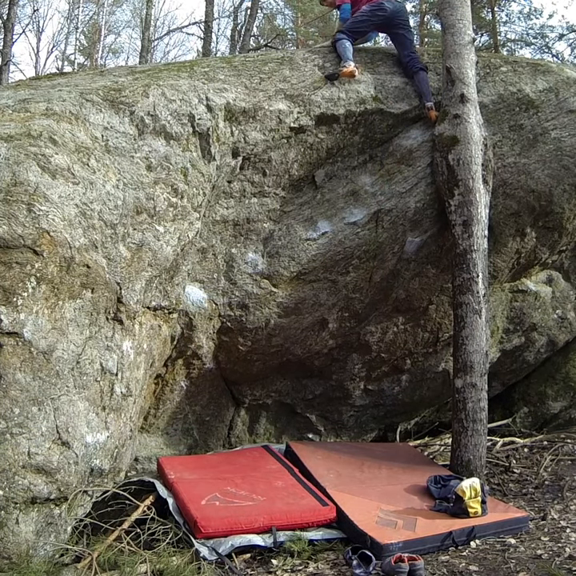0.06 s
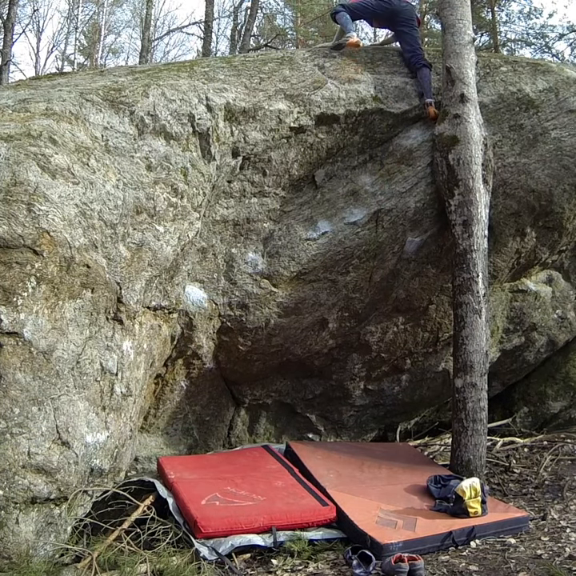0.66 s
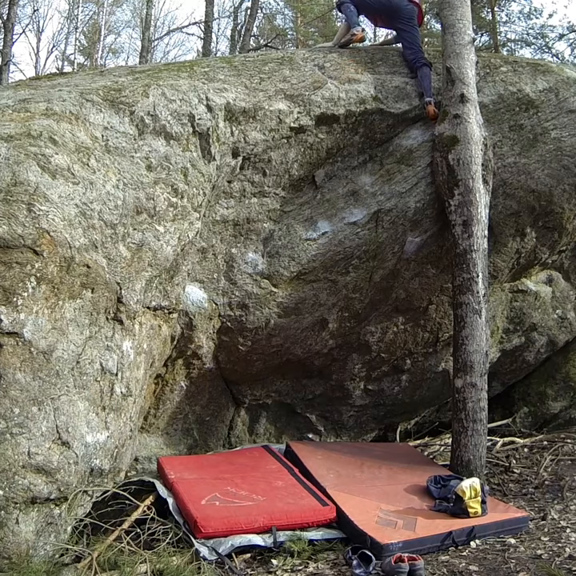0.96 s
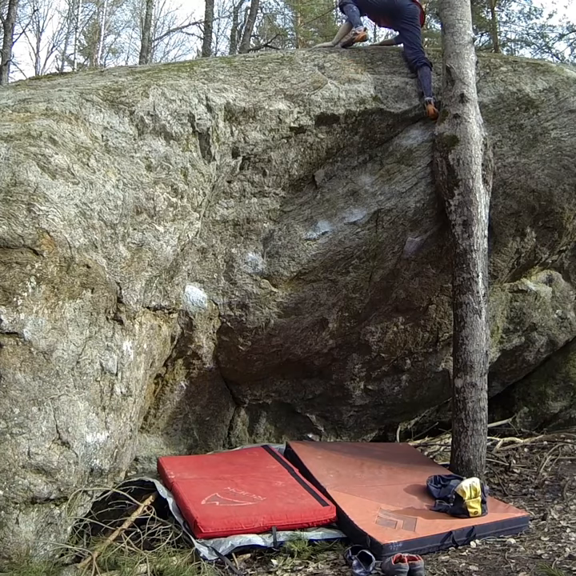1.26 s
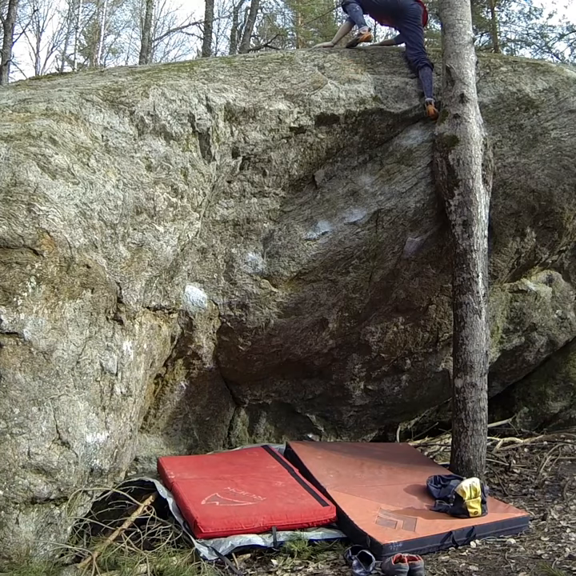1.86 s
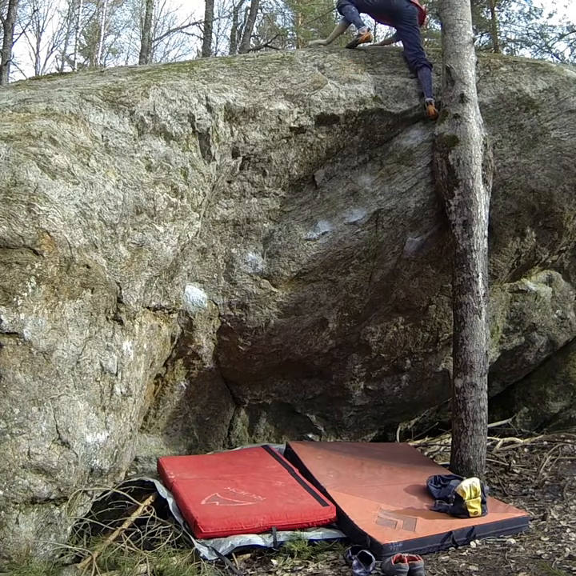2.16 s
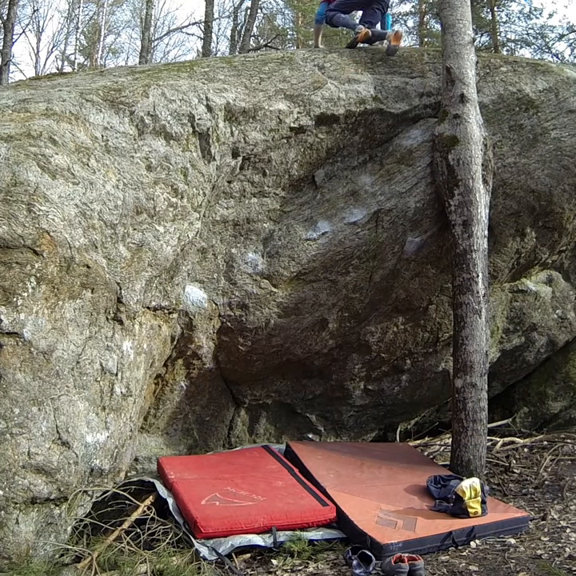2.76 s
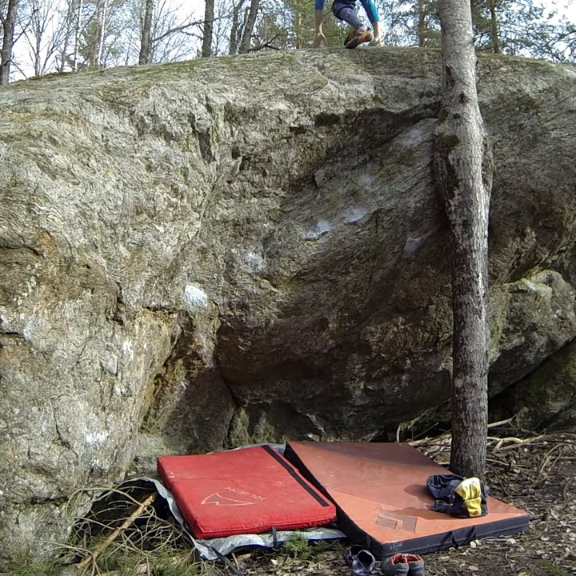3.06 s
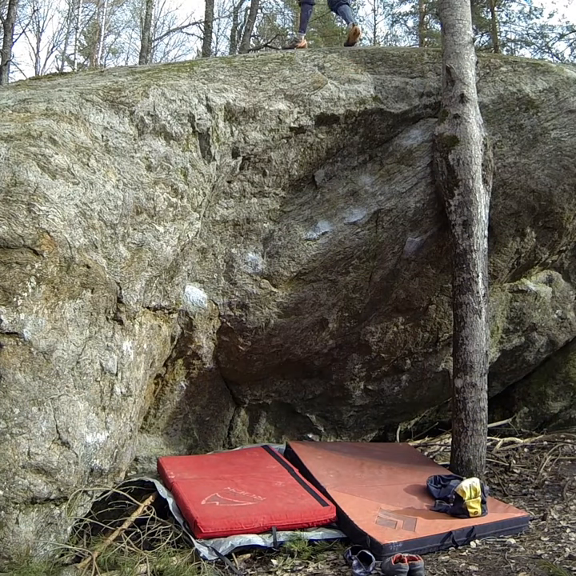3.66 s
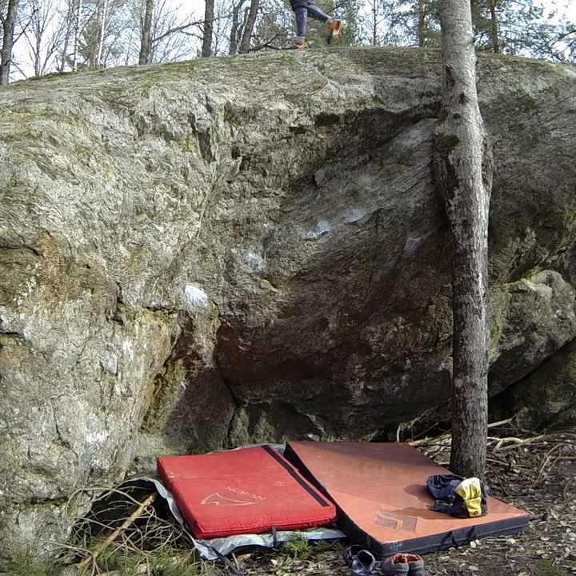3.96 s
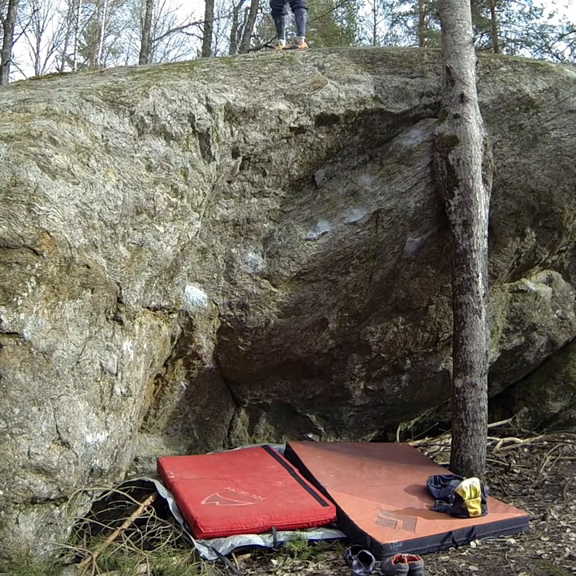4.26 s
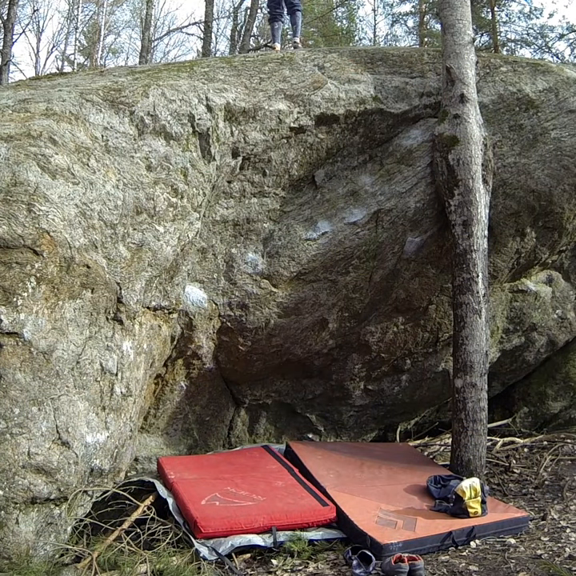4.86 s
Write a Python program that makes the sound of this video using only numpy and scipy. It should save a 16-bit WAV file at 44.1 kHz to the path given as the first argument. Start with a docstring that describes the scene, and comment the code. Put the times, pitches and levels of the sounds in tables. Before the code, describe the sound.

In a quiet forest, wind buffets the microphone with a low rumble that dies away within two seconds. Through it a small bird close by gives four sharp chips, and thin, high calls and warbles follow. Shoes scuff and tap a few times on gritty rock while another bird whistles farther off. The calls echo softly over a faint, distant hush.

```python
"""On top of a boulder in a quiet forest, one microphone. It opens on a low rumble, probably wind
buffeting the microphone, which dies away in two seconds. Through it a small bird close by gives four
sharp chips, both sides of its syrinx sounding at once. Thin tsits, slurs and warbles follow. From 2.4 s
a climber's shoes scuff, then tap the rock, and from 3.6 s a bird whistles farther off.
The trees return a soft echo of the calls, and a distant hush lies under it all."""
import sys
import numpy as np
from scipy import signal
from scipy.fft import rfft, irfft
from scipy.io import wavfile
from scipy.ndimage import uniform_filter1d, map_coordinates

SR = 44100
rng = np.random.default_rng(int(sys.argv[2]) if len(sys.argv) > 2 else 0)


def wav_out(sig):
    """Save sig, one row per channel (or a flat mono array), as 16-bit PCM at SR to the path in sys.argv[1]."""
    wavfile.write(sys.argv[1], SR, np.round(np.clip(np.atleast_2d(sig).T, -1, 1) * 32767).astype(np.int16))


N = 224998
TIME = np.arange(N) / SR

# Note shapes, one per sounding side of the syrinx: share of note, f/Hz, level/dB
CHIP_UPPER = [(0, 2000, -32), (.15, 2889, -20), (.35, 4290, -11), (.5, 5670, -2.5), (.65, 6600, 2),
              (.8, 7720, -1.5), (.92, 8560, -5.5), (1, 8700, -8)]
CHIP_LOWER = [(0, 1700, -26), (0.149, 2400, -16.5), (.4, 2900, -16), (.53, 3596, -14.5), (0.651, 4907, -4),
              (.78, 6430, 1), (.88, 7170, 1), (1, 7100, -11)]
ARCH = [(0, 4900, -20), (.15, 6500, -5), (0.299, 7400, 0), (.45, 7380, 2.5), (.7, 6950, 0.5),
        (.88, 6240, -11), (1, 6705, -16)]
# Calls close to the microphone: t/s, length/s, pitch ratio, level/dB
CHIPS = [(.704, 0.05, 0.97, -39.5), (.791, 0.047, 0.98, -37.5), (.894, .048, 1.0, -37.5),
         (1.015, .05, 0.95, -40)]
ARCHES = [(.567, 0.049, 1.0, -49)]


def near_chips():
    """Close by: one arched note, then four chips in which both sides of the syrinx sweep upward."""
    chips = two_voiced(CHIPS, CHIP_UPPER, CHIP_LOWER, jitter=0.0278,
                       sum_db=0, coupling=0.098, octave_db=-22, rasp_db=-9)
    return chips + one_voiced(ARCHES, ARCH, jitter=0.0087, overtone_db=-1, harmonics=2)


# Shapes of the thinner notes: share of note, f/Hz, level/dB
TSIT_UPPER = [(0, 7950, -10), (.2, 7900, -9), (.55, 8054, -3.5), (.75, 8080, -3.5), (1, 8090, -15)]
TSIT_LOWER = [(0, 4220, -55), (.4, 4570, -20), (.55, 5070, -15.5), (.72, 5450, -9.5), (1, 5480, -15)]
SLUR = [(0, 6590, -5), (.1, 6600, -1), (.35, 6020, -1.5), (.6, 5610, 0), (.9, 5280, -1.5), (1, 5270, -4)]
WARBLE = [(0, 4310, -5), (.25, 4515, -1.5), (.7, 3880, -2), (1, 3590, -4.5)]
# Softer calls nearby: t/s, length/s, pitch ratio, level/dB
TSITS = [(1.276, 0.035, 0.975, -59.5), (1.641, 0.033, 0.983, -51.5), (2.087, 0.03, 0.99, -48),
         (2.678, 0.028, 0.98, -48.5), (3.738, 0.031, .98, -50.5), (4.447, 0.026, 1, -49.5)]
SLURS = [(1.937, 0.087, 0.99, -52), (2.277, 0.081, 0.98, -52.5)]
WARBLES = [(2.24, 0.083, 0.96, -54), (2.806, 0.088, 0.97, -55), (3.872, .089, 0.965, -58.5),
           (4.569, 0.089, 0.96, -55)]


def near_thin_calls():
    """Nearby: two-voiced tsits, falling slurs, and warbles that swoop down and back."""
    tsits = two_voiced(TSITS, TSIT_UPPER, TSIT_LOWER, jitter=0.0044,
                       sum_db=7, coupling=0.87, octave_db=-3, rasp_db=-19.5)
    slurs = one_voiced(SLURS, SLUR, jitter=0.0037, overtone_db=-2, harmonics=2)
    warbles = one_voiced(WARBLES, swooping(WARBLE), jitter=0.011, overtone_db=-4, harmonics=5)
    return tsits + slurs + warbles


# A note that rises and holds: share of note, f/Hz, level/dB
WHISTLE = [(0, 3500, -20), (.09, 4130, -11), (.17, 4480, -5), (.3, 4630, -3), (.5, 4675, -3),
           (.82, 4635, -3.5), (1, 4560, -7)]
# Calls from deeper in the forest: t/s, length/s, pitch ratio, level/dB
WHISTLES = [(3.634, 0.08, 1.001, -54), (3.85, .11, 0.982, -52), (4.055, .11, .959, -55.5),
            (5.038, 0.1, 0.998, -53.5)]
TWITTERS = [(2.55, 0.028, 0.74, -68.5), (2.588, 0.021, 0.63, -70), (2.635, 0.027, 0.92, -68),
            (2.66, 0.03, 0.83, -66.5)]


def far_calls():
    """Farther off: pure whistles and a faint, rough twitter, each from one side of the syrinx."""
    return one_voiced(WHISTLES, WHISTLE, jitter=0.0071) + one_voiced(TWITTERS, WHISTLE, jitter=0.049)


# Resonance of the near birds' throat and beak: f/Hz, gain/dB
THROAT = [(2000, -15.5), (4200, -11.5), (5300, -2.5), (8500, -3), (10500, -13), (13000, -12),
          (15000, -24.5)]


def one_voiced(calls, shape, jitter, overtone_db=0, harmonics=1):
    """Whistled notes: the throat picks out whichever harmonic lies in its resonance."""
    out = np.zeros(N)
    k = np.arange(1, harmonics + 1)[:, None]
    for s, length, ratio, db in calls:
        hz, phase, strength = syrinx(shape, length, ratio, jitter)
        gains = response(THROAT, k * hz) * undb(overtone_db * (k - 1)) * (k * hz < SR / 2)
        tone = np.sum(gains * np.sin(k * phase), axis=0) / np.linalg.norm(gains, axis=0)
        add(out, s, undb(db) * strength * tone)
    return out


def two_voiced(calls, upper, lower, jitter, sum_db, coupling, octave_db, rasp_db):
    """Both sides of the syrinx sound at once; their coupling adds a sum tone and a rasp."""
    out, rasp = np.zeros(N), noise(THROAT)
    for s, length, ratio, db in calls:
        _, high_phase, high_strength = syrinx(upper, length, ratio, jitter)
        _, low_phase, low_strength = syrinx(lower, length, ratio, jitter)
        n = len(low_phase)
        both = np.abs(high_strength * low_strength / 2) ** coupling  # grows as both sides sound
        sum_phase = high_phase + low_phase
        sum_hz = np.gradient(sum_phase) * SR / (2 * np.pi)
        note = high_strength * np.sin(high_phase)
        note += low_strength * (np.sin(low_phase) + undb(octave_db) * np.sin(2 * low_phase))
        note += both * undb(sum_db) * response(THROAT, sum_hz) * np.sin(sum_phase)
        note += signal.windows.tukey(n, .2) * undb(rasp_db) * np.roll(rasp, rng.integers(N))[:n]
        add(out, s, undb(db) * note)
    return out


def syrinx(shape, length, ratio, jitter):
    """Pitch, phase and strength of one vibrating membrane; jitter makes it stray and flutter."""
    n = int(length * SR)
    hz, db = curves(shape, np.linspace(0, 1, n))
    hz = hz * ratio * (1 + jitter * (walk(1190, size=n) + 0.6 * walk(60.5, size=n)))
    phase = 2 * np.pi * np.cumsum(hz) / SR
    strength = undb(db) * (1 + 9 * jitter * walk(700, size=n))
    return hz, phase, np.sqrt(2) * strength * signal.windows.tukey(n, .1)


def swooping(shape, centre=.48, half_width=.23, drop_octaves=.92, drop_db=5.5):
    """A note shape with a smooth dip in pitch and strength in mid-note."""
    share = np.linspace(0, 1, 64)
    hz, db = curves(shape, share)
    dip = np.cos(np.pi / 2 * np.clip((share - centre) / half_width, -1, 1)) ** 2
    return np.column_stack([share, hz * 2 ** (-drop_octaves * dip), db - drop_db * dip])


# Shoes on gritty rock: t/s, length/s, level/dB, tilt/(dB per octave)
STEPS = [(2.411, 0.016, -48, 1.5), (2.43, 0.017, -48, 0), (3.146, 0.0066, -54, 2), (3.331, 0.011, -54, 2),
         (3.867, 0.013, -45, 1.5), (3.898, 0.018, -43, 2), (4.659, 0.0074, -47.5, -0.5),
         (4.8657, 0.0051, -40.5, -2.5), (4.884, 0.036, -63, 2)]
# Dry rustles of wings, cloth and grit: t/s, length/s, level/dB
RUSTLES = [(0.908, 0.01, -52), (0.942, 0.012, -53.5), (0.976, 0.013, -48), (1.107, .01, -54.5),
           (1.141, 0.014, -51), (1.172, 0.011, -50), (2.14, .028, -61.5), (3.615, 0.048, -67),
           (3.899, 0.13, -64), (4.316, 0.0033, -59.5)]
# Their spectra: f/Hz, level/dB
STEP_COLOUR = [(100, 9), (250, -1.5), (390, 5), (600, 3.5), (1000, 4), (1450, -4), (2200, -7),
               (3200, -13.5), (5000, -21), (8000, -27.5), (15000, -45)]
RUSTLE_COLOUR = [(300, 13), (800, 1.5), (2000, 3.5), (4000, -2.5), (7000, -2), (10000, -2.5), (13000, -3.5),
                 (15000, -20)]


def scuffs():
    """On top of the boulder: shoes scrape, with light, bright rustles before and between."""
    out = np.zeros(N)
    for s, length, db, tilt_db in STEPS:
        step = scuff(length, STEP_COLOUR, tilt_db, grain_db=2, decay_s=0.0011, tail_db=-6.5)
        add(out, s, undb(db) * step)
    for s, length, db in RUSTLES:
        rustle = scuff(length, RUSTLE_COLOUR, tilt_db=0, grain_db=3.5, decay_s=0.0022, tail_db=-11)
        add(out, s, undb(db) * rustle)
    return out


def scuff(length, spectrum, tilt_db, grain_db, decay_s, tail_db):
    """Grit crackles as the contact builds and lasts, then dies quickly over a faint tail."""
    t = np.arange(SR // 4) / SR
    grains = rng.standard_normal(len(t)) * undb(grain_db * walk(1500, size=len(t)))
    grit = steady(colour(grains, spectrum, tilt_db), span_s=.006)
    pressure = np.minimum(t / (length / 4), 1)
    after = np.maximum(t - length, 0)
    return grit * pressure * (np.exp(-after / decay_s) + undb(tail_db) * np.exp(-after / 0.034))


# Heel strikes on the boulder: t/s, peak level/dB
KNOCKS = [(3.1475, -35), (4.6605, -41), (4.8659, -29)]
# Modes of sole and rock: f/Hz, relative level/dB, t60/s
KNOCK_MODES = [(164, -10, .09), (390, -20, .018), (680, -10, .012), (1010, 11.5, 0.011), (1430, 5, .009),
               (2100, -12, 0.008), (3080, -22, 0.0073)]


def heel_knocks():
    """A hard heel strike rings a few strongly damped modes of sole and rock."""
    out, t = np.zeros(N), np.arange(SR // 4) / SR
    ring = sum(undb(db) * np.sin(2 * np.pi * hz * t) * undb(-60 * t / t60)
               for hz, db, t60 in KNOCK_MODES)
    for s, db in KNOCKS:
        add(out, s, undb(db) * ring / np.abs(ring).max())
    return out


# Gusts at the microphone: t/s, length/s, level/dB
GUSTS = [(0.0, 0.074, -25.5), (.105, .09, -29.5), (.245, 0.082, -30.5), (.355, .16, -25.5),
         (.6, 0.0498, -26.5), (.68, 0.0894, -34), (.785, .13, -29), (.99, .175, -32),
         (1.255, 0.1026, -38.5), (1.36, .13, -33)]
# Spectrum of their eddies: f/Hz, level/dB
EDDY_COLOUR = [(15, -13), (30, 5), (70, 1), (110, -2), (170, -7), (220, -17), (320, -28.5), (500, -57.5),
               (900, -97.5)]


def gusts(strongest_hz=149.6, octaves_per_db=0.02):
    """Right at the microphone: gusts shed eddies and ring a low resonance that sinks as they weaken."""
    flow = air_flow(GUSTS)
    eddies = steady(noise(EDDY_COLOUR), span_s=0.029) * undb(-5.8)
    force = flow / flow.max()
    force_db = 20 * np.log10(force + 1e-3)
    ring_hz = strongest_hz * 2 ** (octaves_per_db * force_db) * (1 + 0.0748 * walk(50))
    phase = 2 * np.pi * np.cumsum(ring_hz) / SR
    ring = np.sqrt(2) * (np.sin(phase) + force * undb(-31) * np.sin(2 * phase))
    ring *= undb(2.6 * walk(45.03))
    return flow * (eddies + ring)


# Single hard buffets: t/s, f/Hz, peak level/dB
BUFFETS = [(0.031, 130, -13.5), (.622, 79.5, -21.5), (.735, 60, -23.5), (0.789, 78, -14.5), (.85, 62, -33),
           (0.964, 66, -22.5), (1.032, 74, -19), (1.117, 86.4, -18), (1.178, 72, -25.5), (1.985, 76, -35)]


def buffets():
    """Air thumps the microphone: each buffet is a push between two suctions."""
    out = np.zeros(N)
    for s, hz, db in BUFFETS:
        offset_squared = (np.pi * hz * (TIME - s)) ** 2
        out += undb(db) * (1 - 2 * offset_squared) * np.exp(-offset_squared)
    return out


# Soft swells after the gusts: t/s, length/s, level/dB
SWELLS = [(1.93, .2, -44), (2.55, .42, -48), (3.08, .12, -51.5), (3.66, 0.073, -48.5), (4.95, 0.14, -49)]
# Spectrum of the draught: f/Hz, level/dB
DRAUGHT_COLOUR = [(15, 3.5), (35, 1.5), (65, 0.5), (100, -4.5), (150, -30.5), (300, -69)]


def draught(start_db=-29.5, fall_db_per_s=9.5, calm_db=-53.5):
    """Light air past the microphone: a rumble that settles to calm, with a few soft swells."""
    fading = undb(start_db - fall_db_per_s * TIME)
    flow = np.sqrt(fading ** 2 + undb(calm_db) ** 2 + air_flow(SWELLS) ** 2)
    return flow * steady(noise(DRAUGHT_COLOUR), span_s=0.097)


def air_flow(puffs, attack_s=0.0248, release_s=.027):
    """Strength of the moving air: each puff builds, holds and dies away."""
    out = np.zeros(N)
    for s, length, db in puffs:
        attack = np.clip((TIME - s) / attack_s, 0, 1)
        release = np.exp(-np.maximum(TIME - s - length, 0) / release_s)
        out += undb(db) * attack * release
    return out


# Breeze overhead: t/s, level/dB
BREEZE = [(0, -75), (.5, -60), (.8, -73.5), (1.3, -66), (1.9, -70.5), (2.5, -87), (5.1, -81)]
# Spectra of the breeze and the forest air: f/Hz, level/dB
BREEZE_COLOUR = [(500, -16.5), (1000, 3), (1500, 2), (2000, -11.5), (4000, -21), (12000, -44.5)]
HUSH_COLOUR = [(71, -30.5), (120, -4), (180, -8), (216, -9), (380, -10.5), (474, -9.5), (569, -12.5),
               (604, -10.5), (655, -12), (887, -12.5), (2690, -27.5), (4370, -31), (5250, -33),
               (11100, -39), (15000, -45.5)]


def forest(hush_db=-58.5):
    """In the distance a smooth hush of forest air; overhead, a breeze in the crowns."""
    hush = noise(HUSH_COLOUR) * undb(hush_db + 0.2 * walk(6.4))
    breeze = noise(BREEZE_COLOUR) * undb(curves(BREEZE, TIME)[0] + 2.2 * walk(6))
    return hush + breeze


def rock_echo(x, delay_s, echo_db):
    """The face of the boulder sends one quick reflection to the microphone."""
    return x + undb(echo_db) * np.interp(TIME - delay_s, TIME, x, left=0)


def tree_echoes(x, wet_db, t60_s):
    """Rock and trunks all around scatter the sound into many small, fading echoes."""
    t = np.arange(SR) / SR
    echoes = rng.standard_normal(SR) * undb(1.5 * walk(300, size=SR))
    echoes *= undb(-60 * t / t60_s) * (t > .004)
    return x + undb(wet_db) * signal.fftconvolve(x, echoes / np.linalg.norm(echoes))[:N]


def undb(db):
    """Decibels to gain."""
    return 10 ** (np.asarray(db) / 20)


def curves(rows, at):
    """Each later column of a table, joined by straight lines over its first column."""
    first, *columns = np.transpose(rows)
    return [np.interp(at, first, c) for c in columns]


def response(spectrum, hz):
    """Gain of a spectrum (f/Hz, level/dB) at the given frequencies."""
    f, db = np.transpose(spectrum)
    return undb(np.interp(np.log(hz + 1e-3), np.log(f), db))


def colour(x, spectrum, tilt_db=0):
    """Filter by a spectrum, tilted by tilt_db per octave about 1 kHz."""
    hz = np.maximum(np.arange(len(x) // 2 + 1) * SR / len(x), 1)
    octaves = np.log2(hz / 1000)
    return irfft(rfft(x) * response(spectrum, hz) * undb(tilt_db * octaves), len(x))


def noise(spectrum):
    """Noise of the given spectrum at rms 1."""
    x = colour(rng.standard_normal(N), spectrum)
    return x / np.sqrt(np.mean(x ** 2) + 1e-20)


def walk(rate, size=N):
    """A smooth random curve with about `rate` turns a second and a spread near 1."""
    at = np.arange(size) * rate / SR
    return map_coordinates(rng.standard_normal(8192), [at], order=2, mode="wrap")


def steady(x, span_s):
    """Hold the rms near 1 over the given span."""
    return x / np.sqrt(uniform_filter1d(x ** 2, max(int(span_s * SR), 2)) + 1e-9)


def add(out, s, x):
    """Mix a sound in at time s."""
    start = int(np.clip(s * SR, 0, N))
    out[start:start + len(x)] += x[:N - start]


def scene():
    """Birds, climber and air at one microphone; the farther calls carry more echo."""
    chips = rock_echo(near_chips(), delay_s=.009, echo_db=-13.5)
    thin, far = near_thin_calls(), far_calls()
    birds = tree_echoes(chips, wet_db=-14.5, t60_s=0.24)
    birds += tree_echoes(thin, wet_db=-16.5, t60_s=0.21)
    birds += tree_echoes(far, wet_db=-9.5, t60_s=0.6)
    climber = scuffs() + heel_knocks()
    wind = gusts() + buffets() + draught()
    return (birds + climber + wind + forest())[None]


def record(dry):
    """The recorder cuts the top steeply above 15.4 kHz."""
    return signal.sosfilt(signal.ellip(10, .2, 80, 15400, fs=SR, output="sos"), dry)


dry = scene()
out = record(dry)
wav_out(out)
```